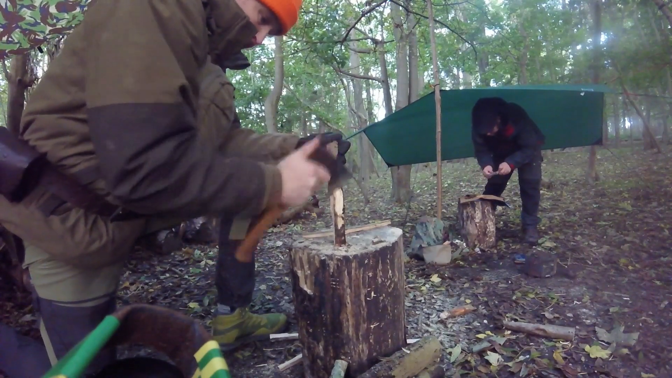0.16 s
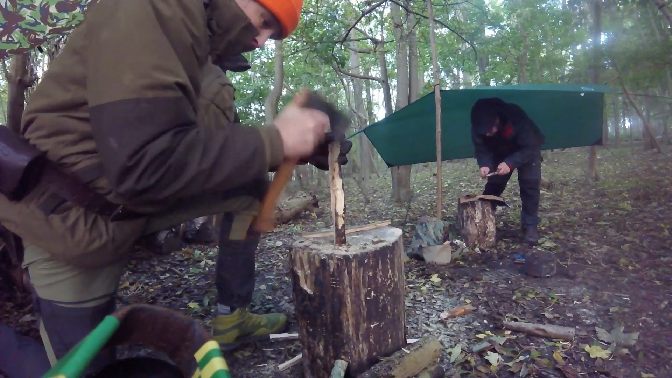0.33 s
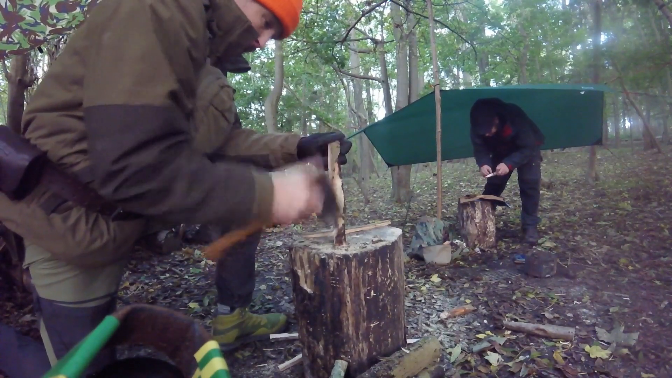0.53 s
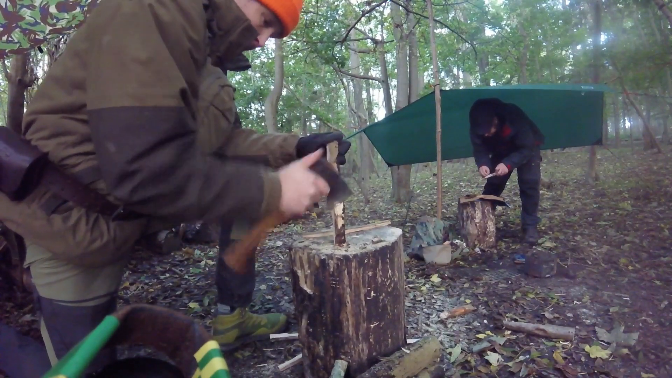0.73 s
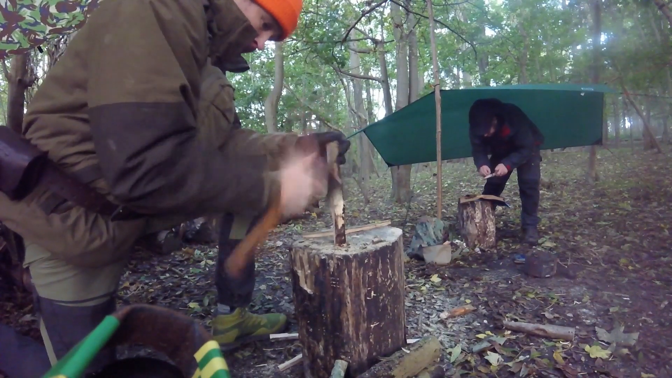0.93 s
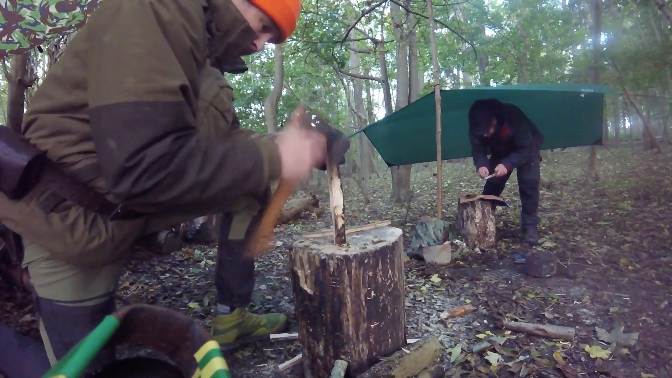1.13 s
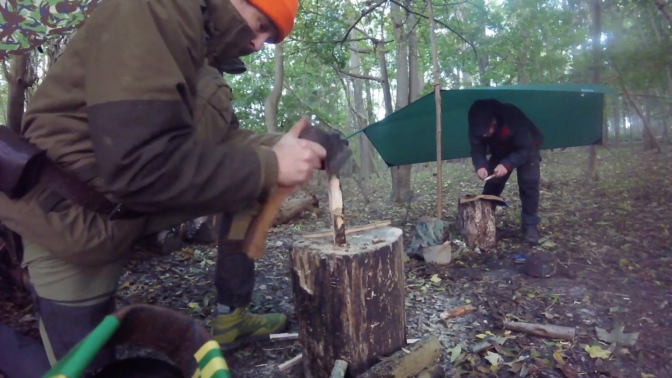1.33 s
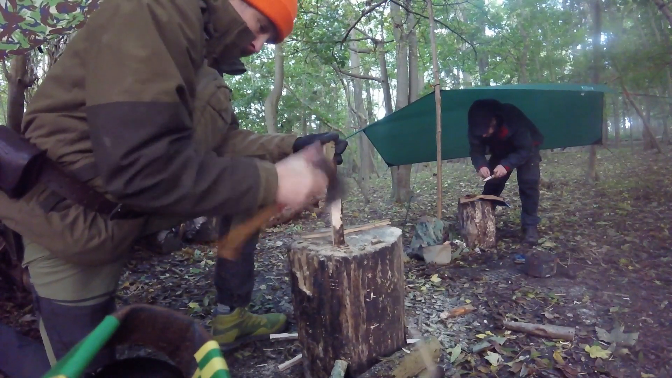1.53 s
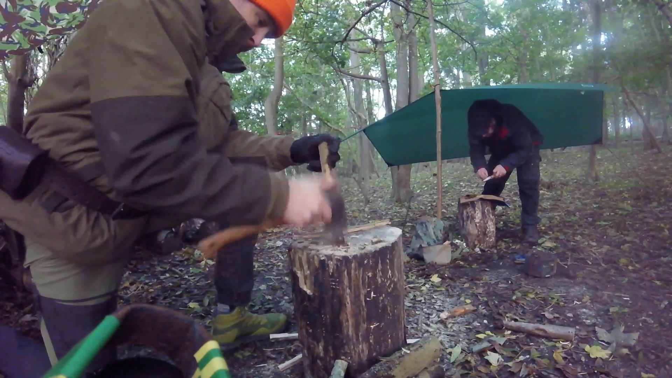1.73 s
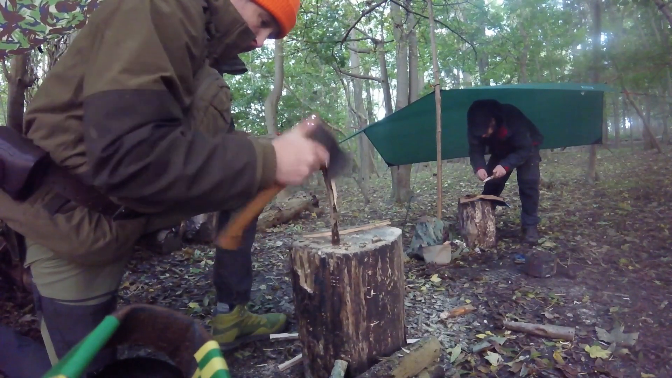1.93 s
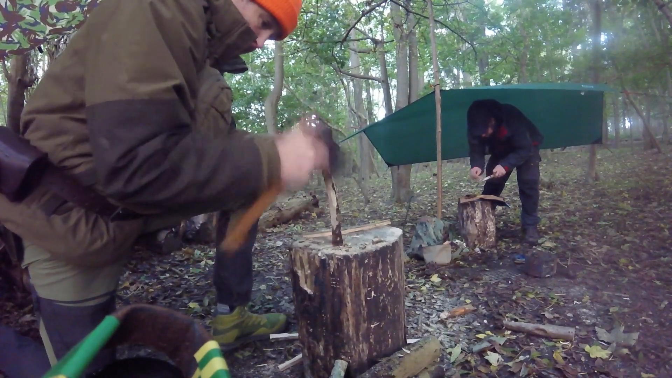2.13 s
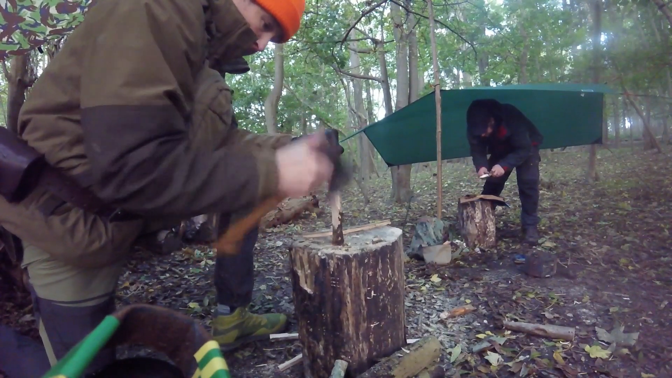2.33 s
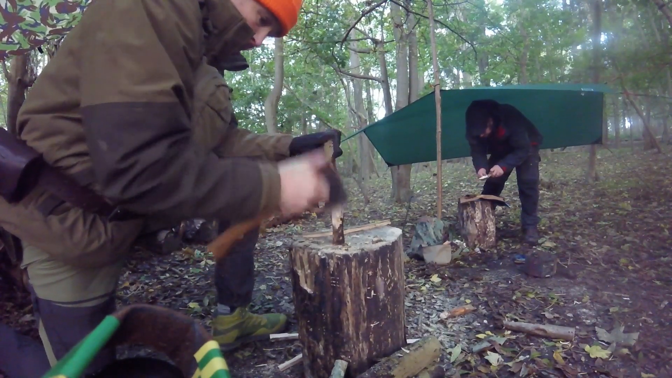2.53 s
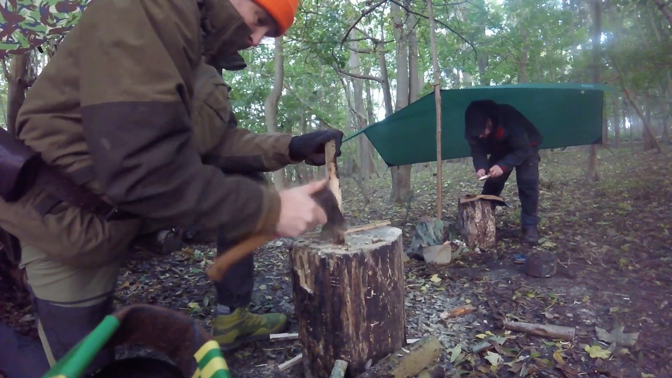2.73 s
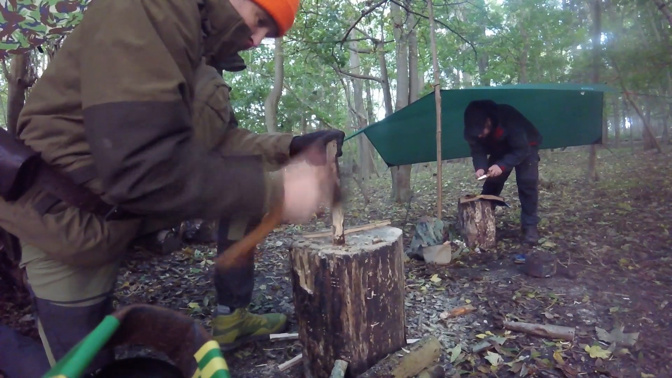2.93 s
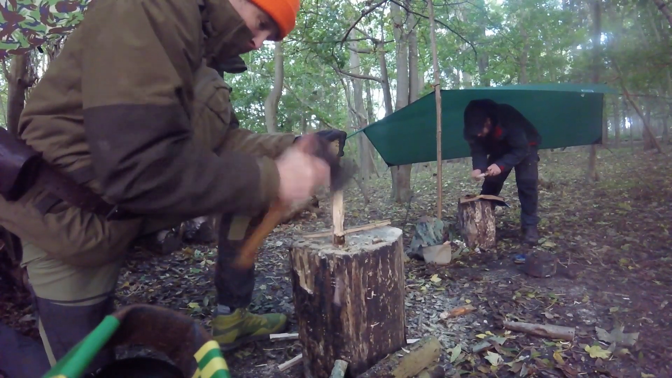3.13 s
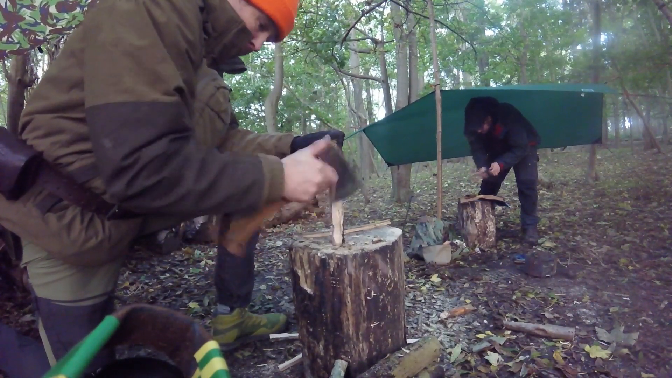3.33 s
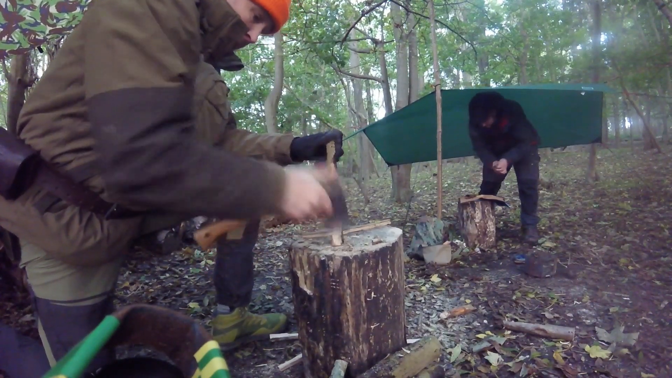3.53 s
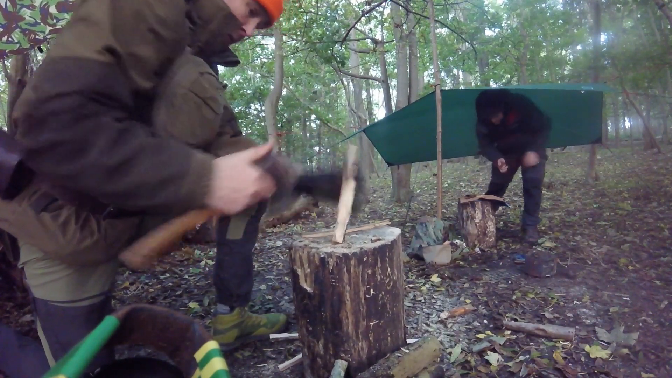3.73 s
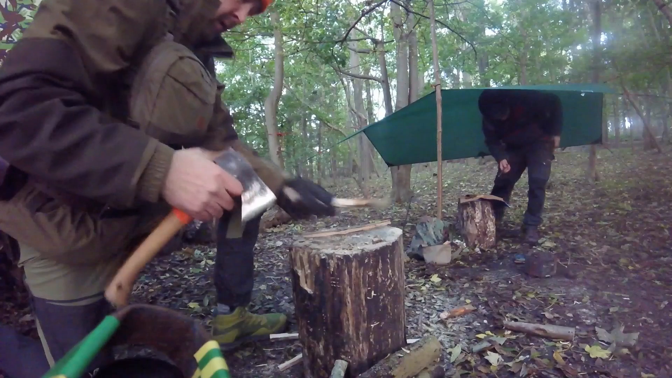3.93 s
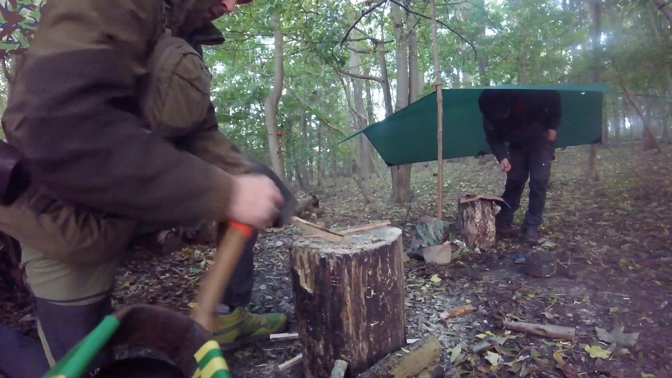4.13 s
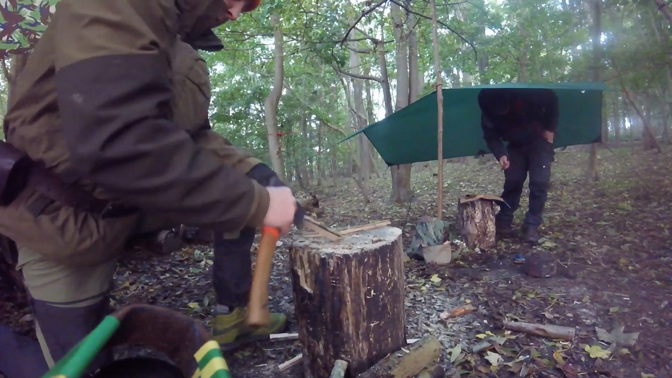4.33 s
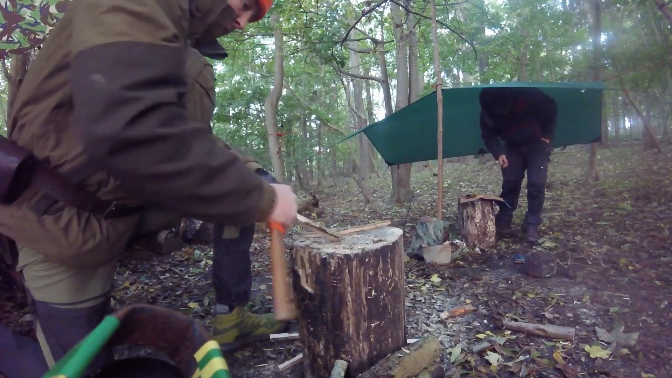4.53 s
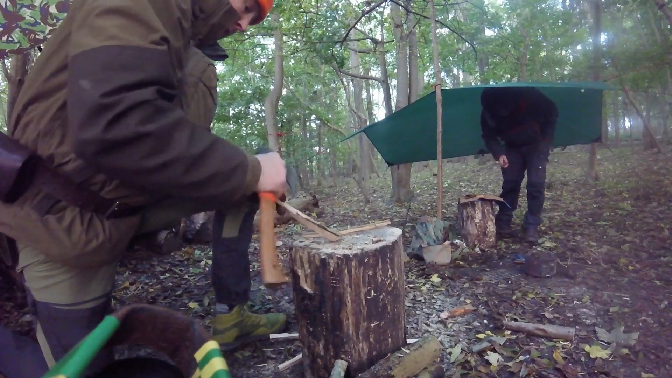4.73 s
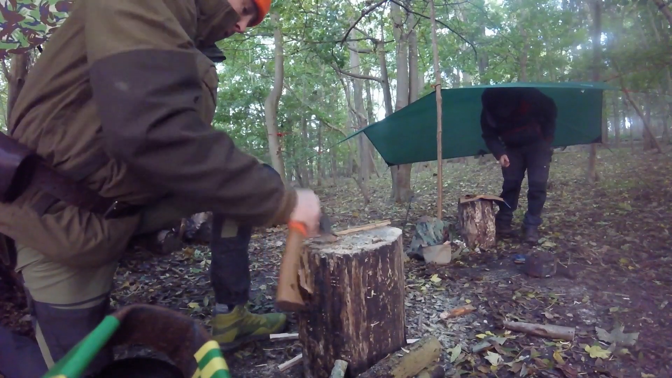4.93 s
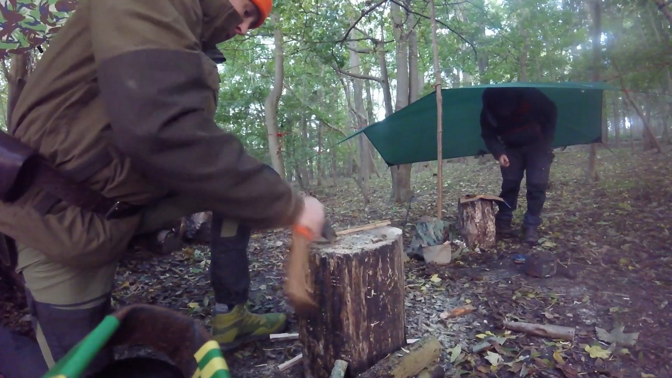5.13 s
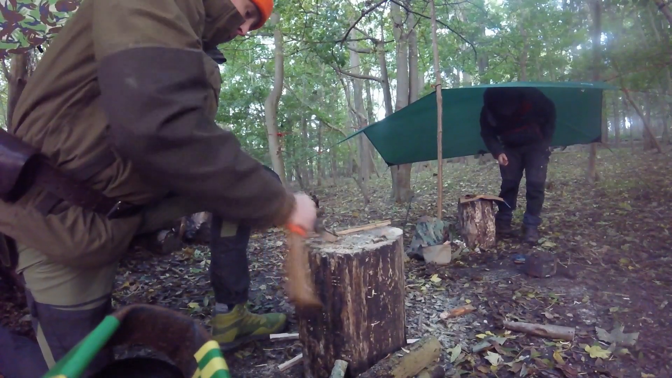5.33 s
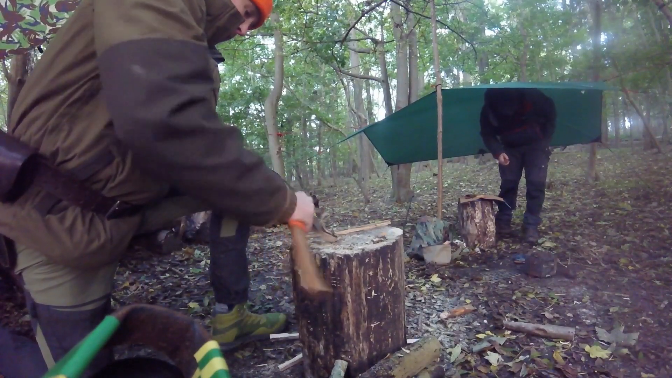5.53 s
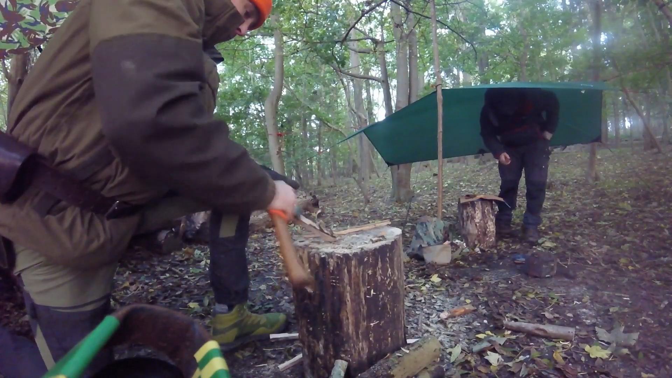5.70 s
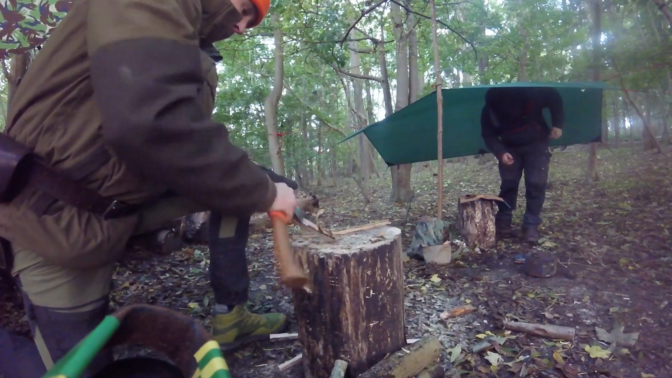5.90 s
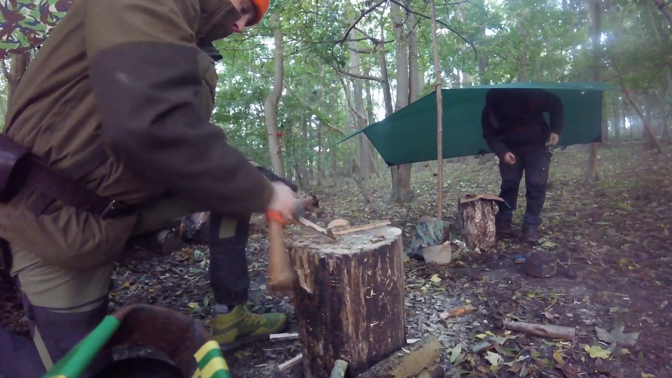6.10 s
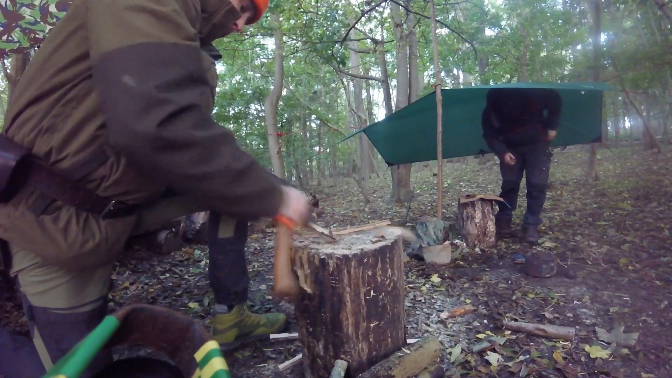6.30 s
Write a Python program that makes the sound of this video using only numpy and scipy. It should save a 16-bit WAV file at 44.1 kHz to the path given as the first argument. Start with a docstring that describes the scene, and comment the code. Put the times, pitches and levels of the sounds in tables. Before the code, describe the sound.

Quick, uneven chopping of a stick on a stump outdoors, sharp cracks and woody thuds, thinning to faint scrapes while wind rumbles on the microphone.

```python
"""Hatchet on an upright stick

Close by, in a wood, a hatchet hews a stick held upright on a stump, about four strokes a second, then shaves.
Bites and landings ring wood modes; cuts are crowds of fibre snaps. Ground and trees return a filtered scatter.
Shaped noise makes air on the microphone and a faint wash of leaves; two tones make a thin electrical whine."""
import sys
import numpy as np
from scipy import signal
from scipy.fft import rfft, irfft
from scipy.io import wavfile
from scipy.ndimage import uniform_filter1d

SR = 44100
rng = np.random.default_rng(int(sys.argv[2]) if len(sys.argv) > 2 else 0)


def log_audio(samples):
    """Write samples as a 16-bit WAV file to the path given in sys.argv[1]."""
    # one column per channel
    frames = np.atleast_2d(samples).T
    # limit to full scale, then quantise
    limited = np.clip(frames, -1, 1)
    pcm = np.round(limited * 32767).astype(np.int16)
    wavfile.write(sys.argv[1], SR, pcm)


N = 284886
T = np.arange(round(0.2 * SR)) / SR  # time axis of one short sound, s
STUMP_DB = 20.5  # how strongly the stump answers a blow


def amp(db):
    """Decibels to gain."""
    return 10 ** (np.asarray(db) / 20)


def evened(x):
    """Scales a sound to rms 1."""
    return x / np.sqrt(np.mean(x ** 2) + 1e-20)


def unit(x):
    """Scales a sound to energy 1."""
    return x / np.linalg.norm(x)


def read(points, hz):
    """Reads a curve of (Hz, value) points at hz, on a log-frequency axis."""
    f, value = np.transpose(points)
    return np.interp(np.log(hz + 1), np.log(f + 1), value)


def curve(points):
    """Draws a control of (s, value) points at every sample."""
    return np.interp(np.arange(N) / SR, *np.transpose(points))


def add(mix, s, sound):
    """Mixes a sound in at time s."""
    part = mix[max(round(s * SR), 0):][:len(sound)]
    part += sound[:len(part)]


def through(x, response):
    """Convolves and keeps the length."""
    return signal.fftconvolve(x, response)[:len(x)]


def high_pass(x, order, hz):
    """Takes away the bass below hz."""
    return signal.sosfilt(signal.butter(order, hz, "high", fs=SR, output="sos"), x)


def tinted(points):
    """Steady noise of a given spectrum, rms 1."""
    gain = amp(read(points, np.fft.rfftfreq(N, 1 / SR)))
    return evened(irfft(rfft(rng.standard_normal(N)) * gain, N))


def snap(points, tilt_db=0, size=2048):
    """The click of a spectrum, energy packed at its start (minimum phase); tilt in dB per octave above 1 kHz."""
    hz = abs(np.fft.fftfreq(size, 1 / SR))
    octaves = np.log2(np.maximum(hz, 1000) / 1000)
    log_gain = np.log(amp(read(points, hz) + tilt_db * octaves))
    return unit(np.fft.ifft(np.exp(np.conj(signal.hilbert(log_gain)))).real)


def ring(hz, db, t60):
    """One dying mode: a sine that falls 60 dB in t60 seconds."""
    return amp(db - 60 * T / t60) * np.sin(2 * np.pi * hz * T)


def bites(low_hz=330, contact_s=0.00025):
    """The edge cracks into the stick: a short hollow tock with little bass, then its foot bumps the stump."""
    # the blade meets the stick: start_s, level_db, crack_db (relative to the blow, before crack_gain_db),
    # crack_tilt_db_per_octave, foot_db (bump relative to the blow, before the stump's gain)
    strokes = [(0.2201, -26.5, -7, 1, -8), (0.4934, -26, -6, 1, -25), (0.7505, -14.5, -6, 3.5, -9.5),
               (1.0074, -7.5, -3, 6.5, -12), (1.2420, -9, -11, 4.5, -6.5), (1.4640, -11.5, -7, -2, -6),
               (1.6555, -18.5, -10, 6, -16.5), (2.5104, -20.5, -6.5, 0, -0.5), (2.7720, -17.5, -6, -3, -17),
               (3.0210, -19, 8, 1, -8.5), (3.2460, -13.5, 3, 0.5, -25), (4.908, -25.5, 2.5, -3.5, -24),
               (5.0930, -18, 5.5, -4, -19)]
    # modes of the hand-damped stick: multiple of its pitch, level_db (relative), t60_s
    stick = [(.42, -41, 0.012), (.69, 1, 0.076), (1, 25.5, 0.012), (1.199, -32, 0.0079), (1.65, 1.5, 0.039)]
    stick_hz, crack_gain_db = 884, 5
    # delay of the bump, top of its push, extra level of the stump's deep modes
    foot_s, foot_hz, foot_thud_db = 0.00973, 637, -16.5
    out, foot = np.zeros((2, N))
    modes = sum(ring(stick_hz * ratio, level, t60) for ratio, level, t60 in stick)
    tock = modes * (1 - np.exp(-T / contact_s))
    tock = tock / abs(tock).max()
    for s, db, crack_db, tilt_db, foot_db in strokes:
        snapped = amp(crack_db + crack_gain_db) * crack(tilt_db, decay=0.0049, crumble=0.14)
        add(out, s, amp(db) * (tock + snapped))
        add(foot, s + foot_s, amp(db + foot_db + STUMP_DB) * stump(foot_hz, foot_thud_db))
    return high_pass(out, 2, low_hz) + foot


def slices(release=0.011, slowing=0.51, ring_db=-7, shudder_db=6.5,
           peel_db=-4.0, peel_release=0.0076, curling=1.3):
    """Fibres snap in quick succession as the blade slows; their pull rings the cut and shakes the stump."""
    # the edge tears along the grain: start_s, length_s, level_db (before the cut's duration adds energy),
    # tilt_db_per_octave
    cuts = [(0.22, 0.0071, -43.5, 0), (0.4958, 0.028, -37.5, -2), (0.751, 0.0051, -34.5, -0.5),
            (1.006, 0.018, -35, 0.5), (1.254, 0.0054, -28.5, 0.5), (1.4733, 0.012, -35.5, 1),
            (1.655, 0.014, -47, -3.5), (1.679, 0.017, -48, 0.5), (2.217, 0.04, -49, -1),
            (2.506, 0.015, -36.5, 1), (2.773, 0.029, -35.5, 0), (3.02, 0.019, -34, -0.5),
            (3.247, 0.0053, -38, -9), (3.262, 0.008, -28, 0), (3.479, 0.022, -40, 0),
            (4.905, 0.028, -50, 3), (4.949, 0.025, -54, 0), (5.092, 0.0067, -37.5, -3),
            (5.164, 0.026, -49, 0), (5.249, 0.029, -57.5, -5), (5.349, 0.036, -51.5, 2),
            (5.552, 0.068, -54.5, -0.5), (5.814, 0.029, -51.5, 2.5), (6.041, 0.019, -51.5, -1),
            (6.241, 0.057, -55.5, -6), (6.279, 0.016, -45, 3.5), (6.368, 0.023, -58, -3)]
    # gentler strokes take longer to gather speed: level_db, share of the length spent rising
    gathering = [(-51, 0.52), (-36.5, 0.23)]
    # spectrum of a fibre's snap: freq_hz, level_db (relative)
    fibres = [(200, -28), (800, 5.5), (1450, 7.5), (1900, -1.5), (2550, 1.5), (3150, 1.5), (3800, 4.5),
              (4600, -6), (5400, -3.5), (6400, -5), (7400, -0.5), (9300, -20.5), (11800, -18), (15500, -20)]
    # spectrum of the curling shaving's snaps: freq_hz, level_db (relative)
    shaving = [(1500, -59), (4500, -8), (5400, 18.5), (6400, 3.5), (7500, -8), (9300, 3), (11800, 5),
               (13300, 6), (15200, -0.5)]
    out = np.zeros(N)
    for s, length, db, tilt_db in cuts:
        after = np.maximum(T - length, 0)
        rise = length * np.interp(db, *np.transpose(gathering))
        slowed = slowing ** (np.maximum(T - rise, 0) / length)
        speed = np.minimum(T / rise, 1) * slowed * np.exp(-after / release)
        force = speed * crackle(per_s=3200)

        tear = unit(through(force, snap(fibres, tilt_db)))
        tear += amp(ring_db) * unit(through(force, splinter()))
        shudder = amp(shudder_db) * unit(through(force, stump(hard_hz=870, thud_db=-6.5)))

        # the shaving curls away as the cut deepens: its bright snaps build towards the end
        curl = np.minimum(T / length, 1) ** curling * np.exp(-after / peel_release)
        peel = unit(through(curl * crackle(per_s=2600), snap(shaving)))
        peel *= amp(peel_db + 3.1 * tilt_db + 0.21 * db)  # forceful and bright cuts peel most
        add(out, s, amp(db) * np.linalg.norm(speed) * (tear + shudder + peel))
    return out


def knocks(click_db=-13):
    """A blow lands in the stump: its modes ring, with a faint click of the edge."""
    # blade or stick on the stump: start_s, level_db (before the stump's gain),
    # hardness_hz (top of the push), thud_db (extra level of the deep modes)
    landings = [(0.0025, -13.5, 784, 8), (0.2245, -32.5, 802, 12), (0.5005, -16, 1400, -9),
                (1.5015, -7, 720, 5.5), (1.7120, -2.5, 984, 3), (2.2950, -20, 724, 9.5),
                (2.8055, -36, 594, -12), (3.2724, -7, 710, -3.5), (3.5010, -5, 1030, -3),
                (4.1307, -31, 700, -2), (4.1941, -30.5, 690, -6), (5.594, -35, 650, 6),
                (6.0540, -31, 770, 8), (6.0700, -30.5, 650, 8), (6.14, -34, 900, 8), (6.2830, -32, 820, 4)]
    out = np.zeros(N)
    for s, db, hard_hz, thud_db in landings:
        click = amp(click_db) * crack(tilt_db=1.5, decay=0.0062, crumble=0.6)
        add(out, s, amp(db) * (amp(STUMP_DB) * stump(hard_hz, thud_db) + click))
    return out


def crack(tilt_db, decay, crumble, ring_db=-7):
    """A sharp break with a few milliseconds of crumbling, which rings the split wood; energy 1."""
    # spectrum of the break: freq_hz, level_db (relative)
    breaking = [(300, 4), (900, -15), (1500, 4), (1850, 5.5), (2200, 8.5), (2650, -2.5), (3200, 1),
                (3800, 5.5), (4600, -4), (5400, -6), (7500, -26), (9500, -30), (15000, -36)]
    force = crumble * rng.standard_normal(len(T)) * np.exp(-T / decay)
    force[0] = 1
    sound = unit(through(force, snap(breaking, tilt_db)))
    return unit(sound + amp(ring_db) * unit(through(sound, splinter())))


def splinter(detune=0.042):
    """The bright ring of the cut, its modes a little different each time; energy 1."""
    # splitting wood and the blade in it: freq_hz (before detuning), level_db (relative), t60_s
    modes = [(1438, 3, 0.031), (2048, -11, 0.076), (3170, 4, 0.072), (3870, 3.5, 0.0047),
             (5090, 7.5, 0.032), (7125, -3, 0.04)]
    shifts = 1 + detune * rng.standard_normal(len(modes))
    return unit(sum(ring(hz * shift, db, t60) for (hz, db, t60), shift in zip(modes, shifts)))


def crackle(per_s, clump_s=0.00249, spread_db=2.5, clump_db=6):
    """Fibre snaps at random moments, uneven in size singly and by clump; rms 1."""
    knots = np.arange(0, T[-1] + clump_s, clump_s)
    clumps = np.interp(T, knots, rng.uniform(-1, 1, len(knots)))
    single = np.minimum(rng.exponential(1, len(T)), 2.7)
    sizes = amp(spread_db * single + clump_db * clumps)
    signs = np.sign(rng.standard_normal(len(T)))
    return evened(sizes * signs * (rng.random(len(T)) < per_s / SR))


def stump(hard_hz, thud_db, spot_db=2.5, thud_hz=450):
    """The stump's modes under a soft push, weighted a little differently at each spot struck; energy 1."""
    # modes of the stump: freq_hz, level_db (relative), t60_s
    wood = [(206, -21, 0.05), (281.3, -15, 0.068), (339, -22, 0.11), (407, -19.5, 0.035),
            (477.5, -14.5, 0.045), (584, 0, 0.062), (678.3, 2.5, 0.048), (785.6, 2, 0.034),
            (868, -4, 0.071), (917.3, -4.5, 0.064), (1038, -3.5, 0.04), (1338, -14, 0.087),
            (1510, -12, 0.036)]
    spot = spot_db * rng.standard_normal(len(wood))
    modes = np.zeros(len(T))
    for k, (hz, db, t60) in enumerate(wood):
        # neighbours start in opposite directions, so the knock swells for a few milliseconds
        modes += (-1) ** k * ring(hz, db + spot[k] + thud_db * (hz < thud_hz), t60)
    return unit(signal.sosfilt(signal.butter(4, hard_hz, fs=SR, output="sos"), modes))


def forest(x, ground_s=0.0063, ground_db=-13, scatter_db=-31, treble_db=-17):
    """One bounce off the ground, then a faint scatter from trunks, which throw back treble best."""
    # decay of the scatter among the trees: freq_hz, t60_s
    decay = [(200, 0.23), (700, 0.24), (3000, 0.33), (5500, 0.43), (8000, 0.28), (14000, 0.24)]
    taps = rng.standard_normal(SR) * (rng.random(SR) < 2000 / SR)  # about 2000 echoes a second
    hz, t, z = signal.stft(taps, SR, nperseg=256)
    fading = amp(-60 * t / read(decay, hz)[:, None])
    onset = np.minimum(t / 0.0068, 1)
    tail = signal.istft(z * fading * onset, SR, nperseg=256)[1]
    scatter = through(x, unit(tail))
    out = x + amp(scatter_db) * scatter + amp(treble_db) * high_pass(scatter, 1, 2500)
    add(out, ground_s, amp(ground_db) * x)
    return out


def wind(steadiness=0.8, eddies_db=4.5, flurry_db=-12.5, flurry_s=0.054):
    """Eddies roll over the microphone; a few single buffets pull and push once amid a flurry."""
    # spectrum of the eddies: freq_hz, level_db (relative)
    rumble = [(7.1, -5.5), (12, 8.5), (22, 0.5), (41, -3.5), (85, -18.5), (124, -26.5), (184, -35),
              (204, -38), (250, -41.5), (320, -106), (550, -120)]
    # strength of the air on the microphone: time_s, level_db (before eddies_db)
    strength = [(0.0, -29), (0.3, -26), (0.6, -36.5), (0.8, -29), (1.85, -31), (2.1, -24), (2.4, -35),
                (2.75, -24), (3.1, -38.5), (3.4, -24.5), (3.6, -35.5), (4.05, -28.5), (4.25, -36.5),
                (4.4, -30), (5.15, -38.5), (5.25, -42.5), (5.45, -34.5), (6.46, -33.5)]
    # single buffets: centre_s, level_db (approximate peak), rate_hz (higher is briefer)
    buffets = [(0.235, -14.5, 34.5), (1.893, -16.5, 26.7), (2.801, -15, 35), (3.43, -5.5, 32.6),
               (3.846, -13.5, 27.3), (4.39, -19, 30), (4.746, -19.5, 28)]
    # spectrum of the smaller eddies around each buffet: freq_hz, level_db (relative)
    small_eddies = [(12, -20), (35, 0.5), (70, -5.5), (130, -20), (220, -33.5), (350, -67), (1500, -140)]
    t = np.arange(N) / SR
    eddies, flurry = tinted([*rumble, (1500, -140)]), tinted(small_eddies)
    swell = np.sqrt(abs(uniform_filter1d(eddies ** 2, size=4000)) + 1e-9)
    out = evened(eddies / swell ** steadiness) * amp(eddies_db + curve(strength))
    for s, db, hz in buffets:
        u = 2 * np.pi * hz * (T - T.mean())
        pull_push = 2 * u / (1 + u ** 2 / 2) ** 2 * np.hanning(len(T))
        add(out, s - T.mean(), amp(db) * pull_push)
        out += amp(db + flurry_db) * np.exp(-((t - s) / flurry_s) ** 2) * flurry
    return out


def air(leaves_db=-48.0, whine_hz=9635, whine_db=-77):
    """Noise of far leaves and rustling clothes, with a thin electrical whine of two beating tones."""
    # spectrum of the wash: freq_hz, level_db (relative)
    leaves = [(100, 8.5), (200, 0.5), (400, -1), (650, 0), (850, -1), (1250, -14.5), (2200, -18.5),
              (3300, -18), (4600, -23), (6300, -22.5), (8500, -32), (12000, -34.5), (13500, -43),
              (16000, -85)]
    # the wash swells once as the body turns
    rustle_s, rustle_width_s, rustle_db = 3.86, 0.14, 3
    t = np.arange(N) / SR
    whine = sum(np.sin(2 * np.pi * (whine_hz + offset) * t) for offset in (-15, 15))
    turning = np.exp(-((t - rustle_s) / rustle_width_s) ** 2)
    return amp(leaves_db + rustle_db * turning) * tinted(leaves) + amp(whine_db) * whine


def scene():
    """The chopping among the trees, with wind on the microphone and the air behind."""
    chopping = bites() + slices() + knocks()
    return (forest(chopping) + wind() + air())[None]


def record(dry, edge_hz=15500):
    """The recorder rounds off the very highest peaks; the ends fade softly; treble stops at edge_hz."""
    rounded = dry / (1 + (dry / 0.98) ** 8) ** (1 / 8)
    faded = rounded * signal.windows.tukey(N, 0.001)
    band_limit = signal.firwin(511, edge_hz, window=("kaiser", 9), fs=SR)
    return signal.oaconvolve(faded, band_limit[None], "same")


dry = scene()
out = record(dry)
log_audio(out)
```